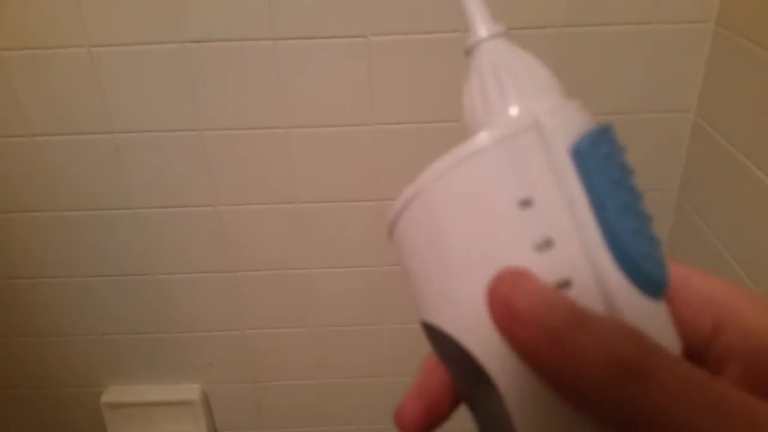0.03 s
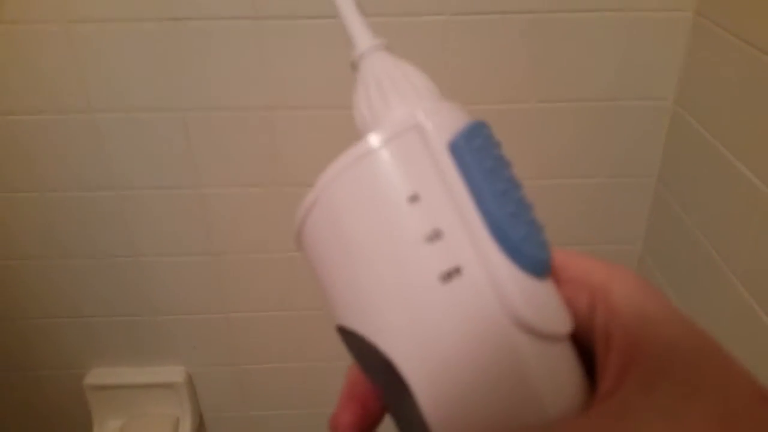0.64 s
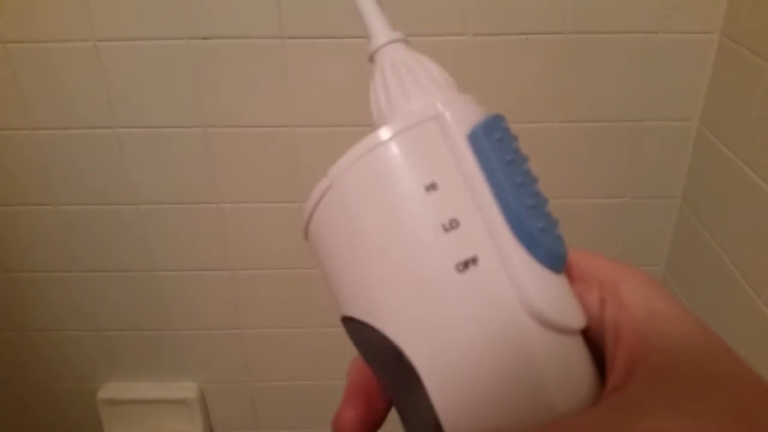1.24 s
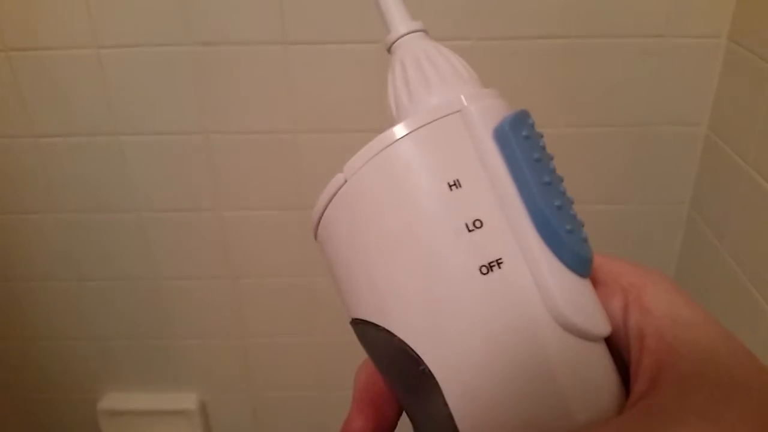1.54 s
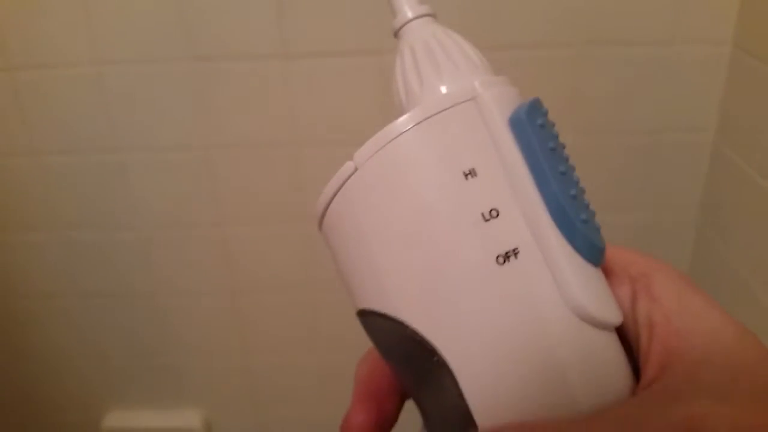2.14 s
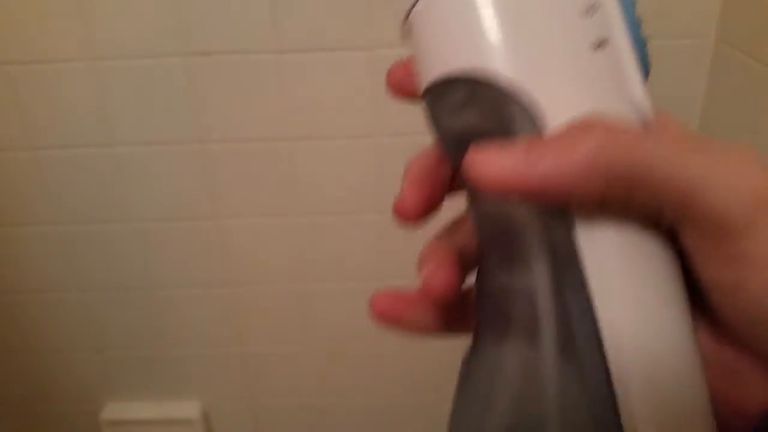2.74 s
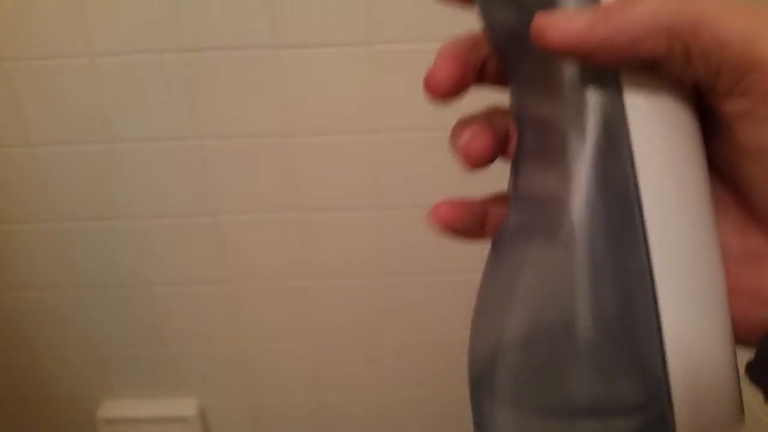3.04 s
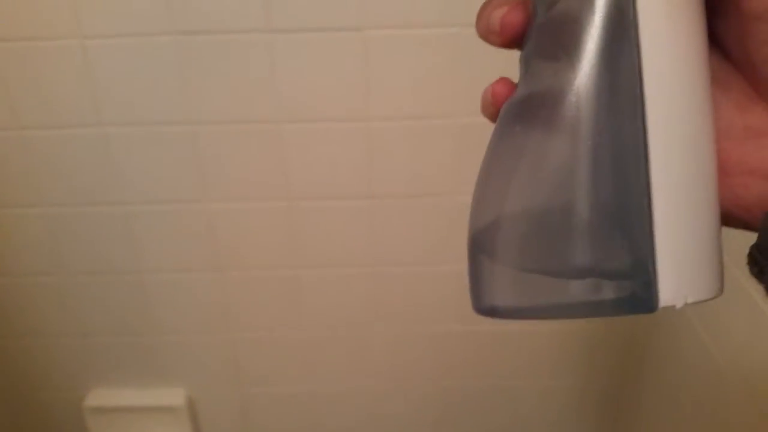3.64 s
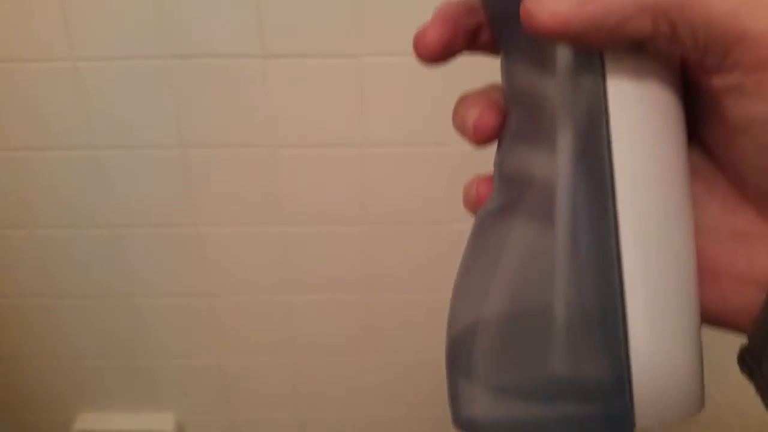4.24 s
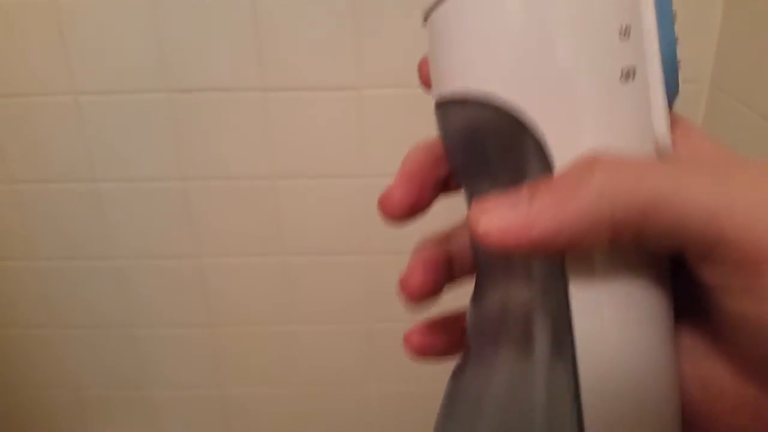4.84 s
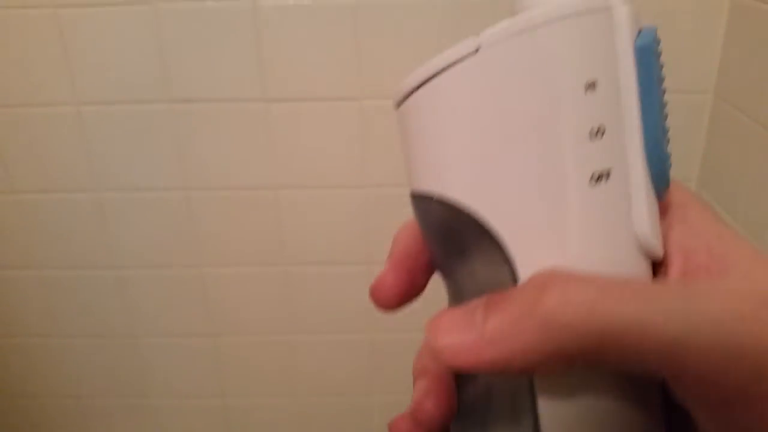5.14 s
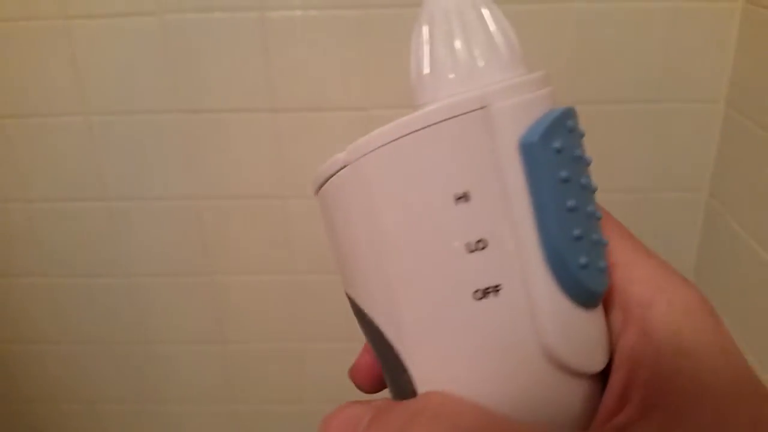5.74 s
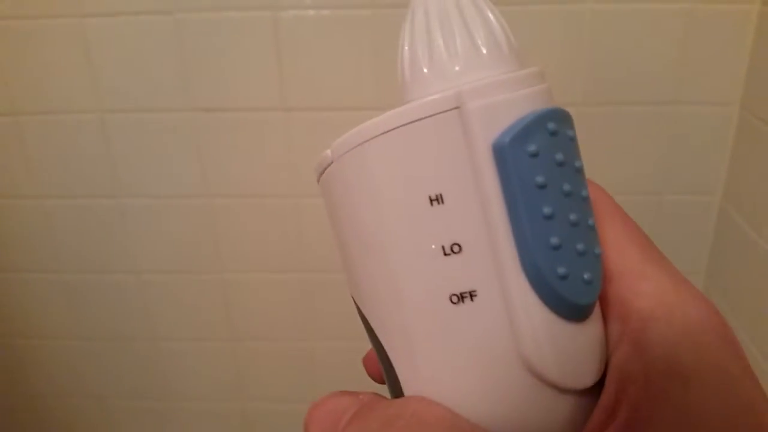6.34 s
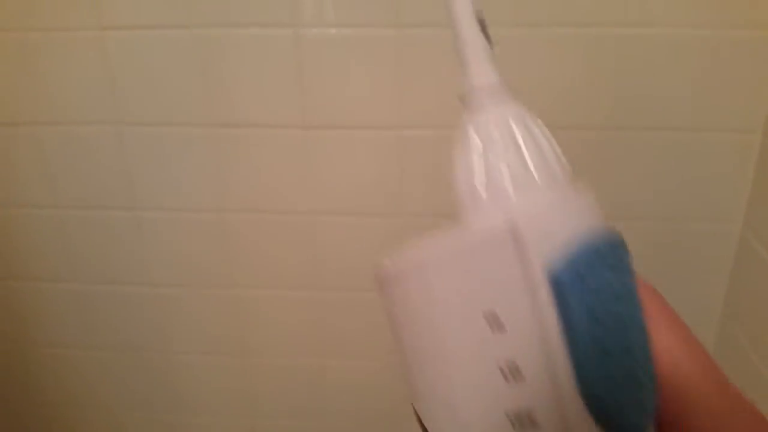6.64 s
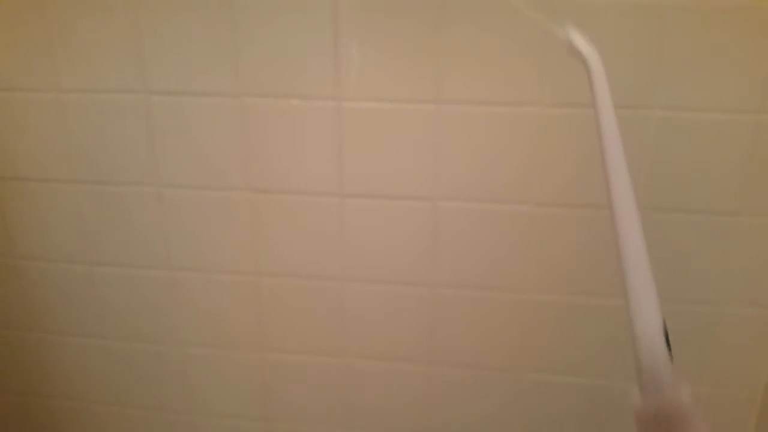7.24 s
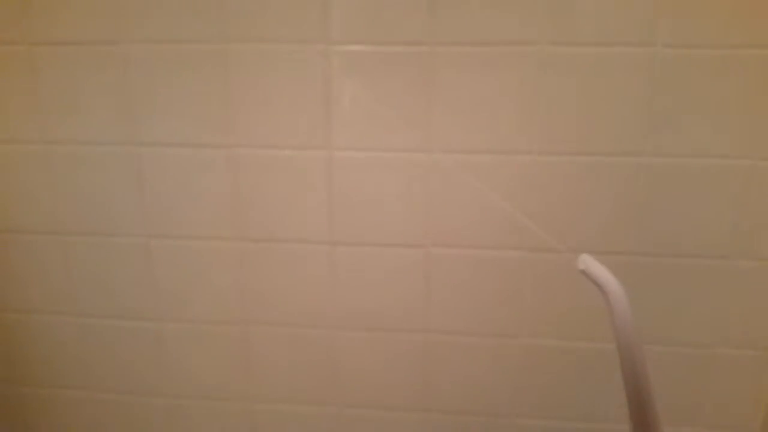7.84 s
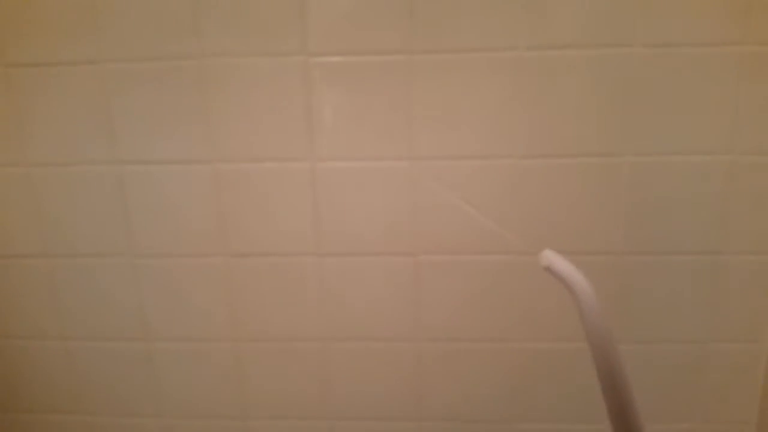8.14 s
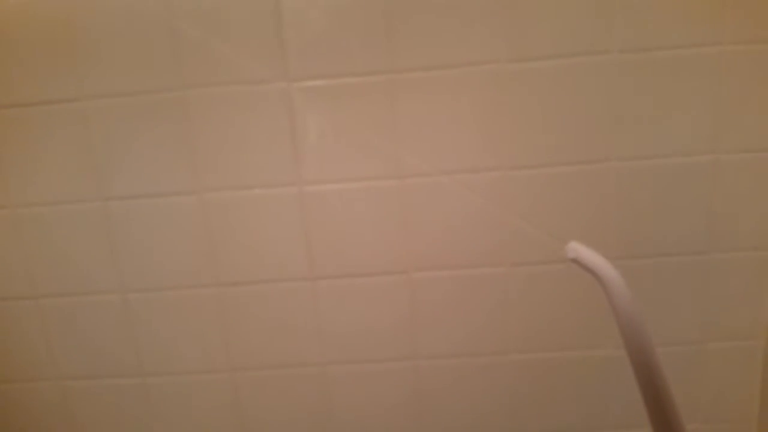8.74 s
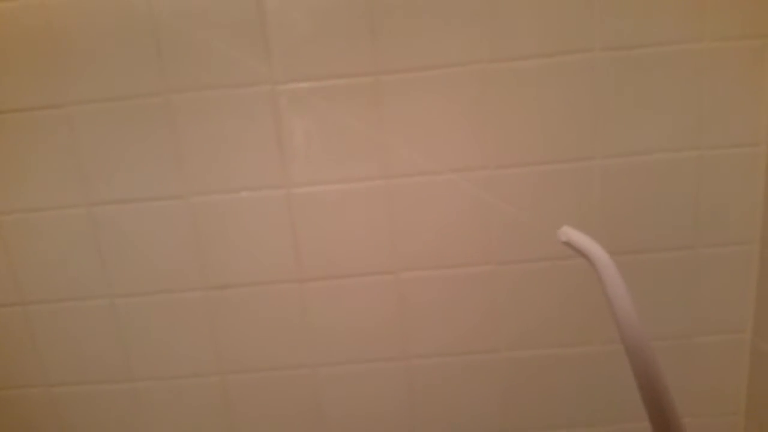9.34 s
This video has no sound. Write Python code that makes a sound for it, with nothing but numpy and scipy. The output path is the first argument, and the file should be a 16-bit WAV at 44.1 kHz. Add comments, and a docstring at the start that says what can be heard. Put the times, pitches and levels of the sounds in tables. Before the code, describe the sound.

The rapid, raspy motor buzz of a handheld water flosser runs steadily, changing colour with the grip, over faint handling thuds and ticks.

```python
"""A cordless water flosser buzzes in a tiled bathroom, turned about in one hand close to the listener.
Its gears whine and rasp in about 39 surges a second, one for each turn of the small gear. The piston
pumps once every two surges, and a slower wheel comes round every four, so part of the rasp repeats.
Tank, case and nozzle each colour the buzz as they pass the microphone, and a cupped palm lowers the
case's hollow ring. The hand bumps the camera, and a few sharp ticks sound over a low rumble."""
import sys
import numpy as np
from scipy import signal
from scipy.fft import rfft, irfft
from scipy.io import wavfile
from scipy.ndimage import uniform_filter1d

SR = 44100
rng = np.random.default_rng(int(sys.argv[2]) if len(sys.argv) > 2 else 0)


def dump(signal):
    """Clip the signal to [-1, 1] and save it as 16-bit WAV at the path in sys.argv[1]."""
    limited = np.clip(np.atleast_2d(signal).T, -1, 1)
    pcm = np.round(limited * 32767).astype(np.int16)
    wavfile.write(sys.argv[1], SR, pcm)


N = 413658
T = np.arange(N) / SR

# How fast the motor runs. Each row: time in seconds, surges a second.
MOTOR_SPEED = [(0.0, 39.14), (0.6, 39.788), (1.5, 39.368), (2.4, 39.452), (4.4, 39.247), (5.3, 39.035),
               (6.4, 39.287), (7.5, 39.047), (8.3, 39.423), (9.38, 38.989)]
# The broad rasp under the ringing parts. Each row: frequency in Hz, level in dB.
RASP_SPECTRUM = [(380, -87.5), (550, -78.5), (720, -68), (900, -65), (1080, -65.5), (1300, -64.5),
                 (2700, -60), (3100, -66.5), (4400, -70.8), (5500, -69), (7500, -73.5), (10300, -75),
                 (11300, -72), (13000, -86), (15700, -78)]
# The tones of the gear hum. Each row: multiple of the surge rate, relative level in dB.
GEAR_HUM_TONES = [(13, -17.5), (17.5, -17.5), (18.5, -5.5), (22, 5), (23, 4), (24, 4), (26.5, 0)]
# The height on the flosser that faces the microphone (tank 4, switch 15, nozzle tip 27).
# Each row: time in seconds, height above the base in cm.
FACING_HEIGHT = [(0, 13), (2.45, 14.25), (2.9, 8), (3.3, 5.3), (4.6, 5), (5.2, 12), (5.8, 17), (6.7, 17.5),
                 (7.6, 25), (9.38, 26)]
# The palm cups the case, then lets go. Each row: time in seconds, cupping from 0 (open) to 1 (sealed).
PALM_CUPPING = [(0, .66), (.2, .74), (.4, .97), (1.4, 1), (2.45, .94), (2.75, .74), (3, .28), (3.4, 0.01)]
# Where each sound leaves the flosser. Each row: level in dB when facing the microphone, height in cm,
# beaming (higher fades faster with distance), dB added by a sealed palm.
SOUND_SPOTS = { "case": (1.59, 11.5, 0.6762, -1.5), "whine": (-21, 19, 2.5, 11), "hum": (-33, 17, 1.5, -3),
               "knock": (-11, 5, 4.5, 10.5), "squeak": (-26.5, 27, 1.5, 11), }
# The plastic parts that ring. Each row: pitch in Hz, width in Hz, share by which full cupping changes
# the pitch, the same for the width, then the four columns of a sound spot.
RINGING_PARTS = { "tank wall": (1694, 353, 0.08, -0.38, -48, 3, 1.4, 0.5),
                 "shell": (1930, 325, -.02, .5, -48.5, 26, 0.77, -9),
                 "hollow": (2567, 440, -.3, -.62, -48.5, 8, 2.5, 10.5),
                 "lid": (2730, 266, 0.02, 0.2, -54, 11, 1, -1),
                 "edge": (3655, 480, 0, -0.27, -54.5, 18.5, 3, 0),
                 "nozzle stem": (4920, 300, 0, 0.5, -57.5, 26.5, 1.9, -3),
                 "collar": (5700, 477, 1, -4, -58, 19.5, 3.5, -15),
                 "nozzle bend": (6353, 590, .03, 0.5, -55, 27.5, 3.5, 6),
                 "tank": (7000, 950, 0, .4, -55.4, 4.7, 3, -0.7),
                 "nozzle tip": (8696, 890, 0.06, -0.52, -47, 28.5, 1, 5),
                 "nozzle base": (9900, 520, 0, 0, -56, 21.5, 5.5, -12), }
# How the direct sound is dulled on the shaded right side. Each row: frequency in Hz, gain in dB.
RIGHT_SHADE = [(800, -9), (1400, -16), (4000, -30), (5200, -31.5), (7500, -66), (9300, -61), (11500, -57),
               (15000, -34)]
# The rasp that bounces off the tiles to the right side. Each row: frequency in Hz, level in dB.
BOUNCED_SPECTRUM = [(380, -82.5), (600, -82.5), (880, -64), (1200, -82.5), (1750, -65.5), (2400, -66),
                    (3600, -70.5), (5000, -68.5), (6500, -76.5), (8000, -85.5), (10000, -86),
                    (12000, -79.5), (15500, -69.5)]
# Soft bumps of the hand. Each row: time in seconds, level in dB, pitch in Hz.
HAND_BUMPS = [(.815, -23, 118), (.879, -25.5, 80), (1.978, -31, 109), (2.668, -26, 128), (3.07, -26, 111),
              (3.255, -30, 100), (3.442, -28.5, 85), (4.489, -25, 105), (8.441, -31, 79)]
# Sharp ticks. Each row: start in seconds, level in dB before the tick is brightened.
SHARP_TICKS = [(2.9677, -19), (5.5633, -22), (5.8641, -25), (8.1214, -18), (9.2414, -26)]
# Faint hums that swell and fade. Each row: start in seconds, length in seconds, pitch in Hz, level in dB.
LOW_HUMS = [(.85, 0.39, 138, -48), (4.3, 0.35, 130, -39), (4.465, 0.14, 276, -49), (5.832, .2, 291, -53),
            (7.182, 0.29, 240, -50.5)]
# The low background noise. Each row: frequency in Hz, level in dB.
RUMBLE_SPECTRUM = [(15, -84), (40, -74.5), (80, -70), (125, -74), (180, -78.5), (260, -80), (380, -93),
                   (700, -105), (2000, -140)]
# How that noise rises and falls. Each row: time in seconds, gain in dB.
RUMBLE_LEVEL = [(0, 0), (1, 1.5), (1.5, -5), (3.3, 0), (5.5, -3.5), (7.2, -3), (8.5, 2), (9.38, -1)]

# How far the whine falls behind: in each surge, extra on the push stroke, in each pump cycle.
SAG_RAD, SAG_PUSH_RAD, LAG_RAD = 2.4, 0.57, 1
# Its swells: half their length, share added on the push stroke, level between swells.
SWELL_SURGES, SWELL_PUSH, SWELL_REST = 0.24, .1, 0.087
DISTANCE_CM = 7.95  # from the microphone to the flosser's centre line
SEAL_POWER = 2.2  # the palm changes the loudness most once it nearly seals
BUMP_DECAY_S = .016
NUDGE_DB, NUDGE_HZ, NUDGES_UNTIL_S = -38, 105, 4.6  # lighter bumps while the grip settles
CUTOFF_HZ = 15950


def case_buzz(turns):
    """Gear rasp rings the case; the treble drops out each time the piston turns round.
    Returns the buzz and a plain rasp to bounce off the tiles."""
    low = rasp(turns, repeat=0.71, grit_db=4) * surge(turns, peak=1.08, depth_db=2.5, limp_db=0)
    hollow = rasp(turns, repeat=0.57, grit_db=3) * surge(turns, peak=1.825, depth_db=2.5, limp_db=.5)
    valve = np.exp(-abs((turns - .9) % 2 - 1) / 0.037)  # shuts once a pump cycle
    chug = stroke(turns, start=0.67, attack=0.17, decay=0.24, rest=1) + 0.83 * valve
    chug *= surge(turns, peak=1.74, depth_db=-0.8, limp_db=0.55)
    broad = rasp(turns, repeat=0.75, grit_db=4) * chug
    piston_gate = stroke(turns, start=.55, attack=.52, decay=.62, rest=.068)
    flutter = amp(0.53 * wobble(N, 2500))
    high = rasp(turns, repeat=0.71, grit_db=3.5) * piston_gate * flutter
    high *= surge(turns, peak=1.94, depth_db=-1.85, limp_db=1.07)
    treble = ringing("edge", "collar", "tank", "nozzle stem", "nozzle bend", "nozzle tip", "nozzle base")
    buzz = colour(dense(low), ringing("tank wall", "shell"))
    buzz += colour(dense(hollow), ringing("hollow", "lid"))
    buzz += colour(dense(broad), spectrum(RASP_SPECTRUM))
    buzz += colour(dense(high), treble)
    scattered = rasp(turns, repeat=.2, grit_db=4) * chug * flutter
    return buzz * spot_gain(SOUND_SPOTS["case"], T), dense(scattered)


def rasp(turns, repeat, grit_db):
    """Worn teeth strike and scrape; repeat is the share that comes round again, the rest is chance."""
    worn = unit(surface(turns, count=4, size=1120)
                + 0.5 * surface(turns, count=2, size=1120)
                + 0.43 * surface(turns, count=1, size=1120))
    scrape = np.sqrt(repeat) * worn + np.sqrt(1 - repeat) * rng.standard_normal(N)
    tooth = (22 * turns).astype(int)  # the small gear has 22 teeth
    flaw = rng.uniform(-1.26, 1, size=88)  # each tooth of the wheel strikes with its own force
    flaw -= .6 * uniform_filter1d(flaw, size=33, mode="wrap")  # nearby teeth partly even out
    force = amp(grit_db * flaw * np.sqrt(2))
    strikes = np.diff(tooth, prepend=tooth[0]) * force[tooth % len(force)]
    fading_strikes = signal.lfilter([1], [1, -np.exp(-1 / (0.0021 * SR))], strikes)
    return scrape * fading_strikes


def gear_whine(turns):
    """The teeth sing in long and short swells by turns, sagging in pitch; a steadier hum lies below."""
    mesh = 2 * np.pi * 44 * turns  # two waves for each tooth
    push = np.cos(np.pi * turns)  # 1 on the push stroke, -1 on the return
    sag = (SAG_RAD + SAG_PUSH_RAD * push) * np.cos(2 * np.pi * (turns - .07))
    sag += LAG_RAD * np.cos(np.pi * (turns - .35))
    from_middle = (turns + .47) % 1 - .5
    swell = SWELL_REST + np.exp(-abs(from_middle / (SWELL_SURGES * (1 + SWELL_PUSH * push))) ** 3)
    wear = surface(turns, count=4, size=4)
    uneven = amp(0.65 * wobble(N, 900))
    whine = swell * uneven * np.sin(mesh + sag + .3 * wear)
    hum = sum(amp(db) * np.cos(2 * np.pi * multiple * turns + .02 * multiple ** 2)
              for multiple, db in GEAR_HUM_TONES)
    hum *= surge(turns, peak=1.98, depth_db=2, limp_db=1.5)
    return spot_gain(SOUND_SPOTS["whine"], T) * unit(whine) + spot_gain(SOUND_SPOTS["hum"], T) * unit(hum)


def piston(turns):
    """Each pump cycle gives a short falling knock, then a softer, lower rebound;
    the wheel squeaks each time it comes round."""
    knock = chirp(turns, count=2, at=2.1, width=0.078, hz=1.04 * tuning("hollow", T)[0], fall=0.0498)
    rebound = chirp(turns, count=2, at=0.32, width=0.16, hz=1650, fall=0.012)
    squeak = chirp(turns, count=4, at=0.39, width=0.19, hz=5080, fall=.004)
    knocks = knock + amp(-3.5) * rebound
    return spot_gain(SOUND_SPOTS["knock"], T) * knocks + spot_gain(SOUND_SPOTS["squeak"], T) * squeak


def surface(turns, count, size):
    """A gear's roughness: size random points a surge, coming round again after count surges."""
    steps = 2 ** 15
    profile = unit(irfft(rfft(rng.standard_normal(count * size)), count * steps))
    return profile[(turns * steps).astype(int) % len(profile)]


def surge(turns, peak, depth_db, limp_db):
    """Loudness swings with each surge; limp_db makes the push and return strokes differ."""
    angle = 2 * np.pi * (turns - peak)
    return amp(depth_db * np.cos(angle) + limp_db * np.cos(angle / 2))


def stroke(turns, start, attack, decay, rest):
    """Loudness rises from a resting level and falls back in each surge; times are in surges."""
    age = (turns - start) % 1
    return rest + (1 - np.exp(-age / attack)) * np.exp(-age / decay) * (1 - age ** 4) ** 2


def chirp(turns, count, at, width, hz, fall):
    """A short falling tone every count surges; at and width are in surges, fall is a share of the pitch."""
    age = (turns - at + count / 2) % count - count / 2
    glide = 1 - fall * np.tanh(age / width)
    return np.exp(-(age / width) ** 2) * np.sin(2 * np.pi * np.cumsum(hz * glide) / SR)


def ringing(*parts):
    """A filter shape for plastic parts that each ring near their own pitch."""
    def gain(f, t):
        power = 0
        for part in parts:
            hz, width = tuning(part, t)
            detune = (f ** 2 - hz ** 2) / (2 * (f + 1) * width)
            power = power + (spot_gain(RINGING_PARTS[part][4:], t) / (1 + detune ** 2)) ** 2
        return np.sqrt(power)
    return gain


def tuning(part, t):
    """The pitch and width of a part's ring, shifted by the cupped palm."""
    hz, width, bend, widen = RINGING_PARTS[part][:4]
    cup = curve(PALM_CUPPING, t)
    return hz * (1 + bend * cup), width * np.maximum(1 + widen * cup, .1)


def spot_gain(spot, t):
    """A spot fades as it moves away from the microphone, and the palm boosts or muffles it."""
    db, height_cm, beaming, palm_db = spot
    distance = np.hypot(1, (curve(FACING_HEIGHT, t) - height_cm) / DISTANCE_CM)
    seal = curve(PALM_CUPPING, t) ** SEAL_POWER
    return amp(db + palm_db * seal) / distance ** beaming


def tile_echo(x, fade_s):
    """Hard walls throw back a blur of echoes that falls by 60 dB in fade_s seconds."""
    t = T[:SR // 2]
    tail = rng.standard_normal(len(t)) * amp(-60 * t / fade_s) * (t > .004)
    return signal.fftconvolve(x, tail / np.linalg.norm(tail))[:N]


def hand_bumps():
    """The hand bumps and nudges the camera: each touch is a dull thud with a little rustle."""
    out, t = np.zeros(N), T[:SR // 4]
    dull = signal.butter(4, [50, 250], "band", fs=SR, output="sos")
    envelope = (t / BUMP_DECAY_S) * np.exp(1 - 2 * t / BUMP_DECAY_S)
    nudges = [(when * NUDGES_UNTIL_S, NUDGE_DB - 4 * size, NUDGE_HZ) for when, size in rng.random((6, 2))]
    for s, db, hz in HAND_BUMPS + nudges:
        rustle = unit(signal.sosfilt(dull, rng.standard_normal(len(t))))
        thud = np.sin(2 * np.pi * hz * t) + 0.57 * rustle
        add(out, s - .004, amp(db) * thud * envelope)
    return out


def ticks():
    """Bright clicks that die in a few milliseconds, among a sparse patter of tiny ones."""
    out, t = np.zeros(N), T[:1500]
    patter = [(when * T[-1], -35 + 3 * min(-np.log(size), 3)) for when, size in rng.random((70, 2))]
    for s, db in SHARP_TICKS + patter:
        add(out, s, amp(db) * rng.standard_normal(len(t)) * np.exp(-t / .0018))
    return colour(out, spectrum([(1500, -18), (6000, -8), (14000, 5)]))


def low_hums():
    """A faint steady hum and a few brief, wavering swells."""
    out = amp(-55.5) * np.sin(2 * np.pi * 122.7 * T)
    for s, length, hz, db in LOW_HUMS:
        count = int(length * SR)
        waver = 1 + 0.047 * wobble(count, 900)
        tone = np.sqrt(2) * np.sin(2 * np.pi * hz * np.cumsum(waver) / SR)
        add(out, s, amp(db) * np.hanning(count) * tone)
    return out


def rumble():
    """Low background noise that rises when the hand is restless."""
    noise = colour(dense(rng.standard_normal(N)), spectrum(RUMBLE_SPECTRUM), size=4096)
    return noise * amp(curve(RUMBLE_LEVEL, T))


def amp(db):
    """Turns decibels into a gain."""
    return 10 ** (np.asarray(db) / 20)


def unit(x):
    """Scales a signal to an average (rms) level of 1."""
    return x / np.sqrt(np.mean(x ** 2) + 1e-20)


def dense(x):
    """Scales white noise to 0 dB per Hz."""
    return unit(x) * np.sqrt(SR / 2)


def wobble(count, span):
    """A slow random drift: count samples of noise, smoothed over span samples."""
    return unit(uniform_filter1d(rng.standard_normal(count), span))


def curve(rows, t):
    """Joins (time, value) rows with straight lines and reads them at the times t."""
    return np.interp(t, *np.transpose(rows))


def spectrum(points):
    """A fixed filter shape drawn through (Hz, dB) points."""
    hz, db = np.transpose(points)
    return lambda f, t: amp(np.interp(np.log(f + 1), np.log(hz), db))


def colour(x, gain, size=1024):
    """Filters x by a shape, gain(frequency, time)."""
    frames = dict(nperseg=size, noverlap=size * 3 // 4)
    f, t, bands = signal.stft(x, SR, **frames)
    return signal.istft(bands * gain(f[:, None], t), SR, **frames)[1][:N]


def add(mix, s, sound):
    """Lays a sound into the mix at s seconds."""
    part = mix[max(round(s * SR), 0):][:len(sound)]
    part += sound[:len(part)]


def scene():
    """The flosser faces the left microphone; the right one hears it shaded and from the tiles."""
    turns = .4 + np.cumsum(curve(MOTOR_SPEED, T)) / SR  # turns of the small gear so far, one a surge
    turns += 0.0032 * unit(uniform_filter1d(wobble(N, 4000), 4000))
    buzz, scattered = case_buzz(turns)
    direct = buzz + gear_whine(turns) + piston(turns)
    left = direct + amp(-19) * tile_echo(direct, fade_s=.35)
    right = colour(direct, spectrum(RIGHT_SHADE)) + amp(-34) * tile_echo(direct, fade_s=0.41)
    right += colour(tile_echo(scattered, fade_s=0.14), spectrum(BOUNCED_SPECTRUM))
    low = rumble() + hand_bumps() + low_hums()
    clicks = ticks()
    left += amp(-0.5) * low + amp(-3.5) * rumble() + clicks
    right += amp(-7) * low + amp(-3.5) * rumble() + amp(-1) * clicks
    return np.array([left, right])


def record(dry):
    """Cuts away the very highest treble."""
    lowpass = signal.firwin(511, CUTOFF_HZ, window=("kaiser", 9), fs=SR)
    return signal.oaconvolve(dry, lowpass[None], "same")


dry = scene()
out = record(dry)
dump(out)
```